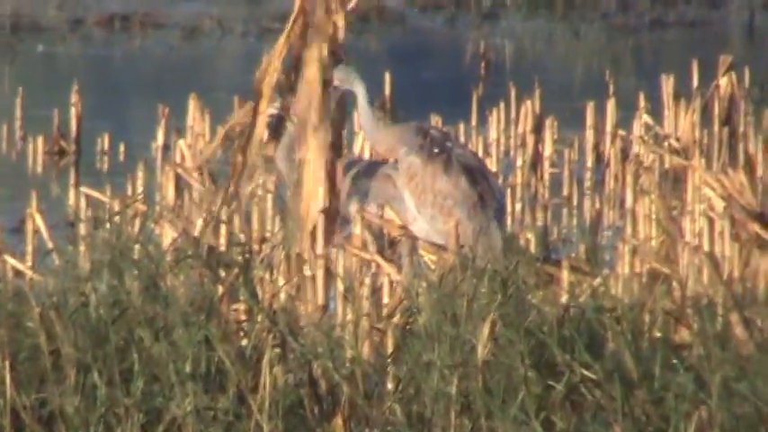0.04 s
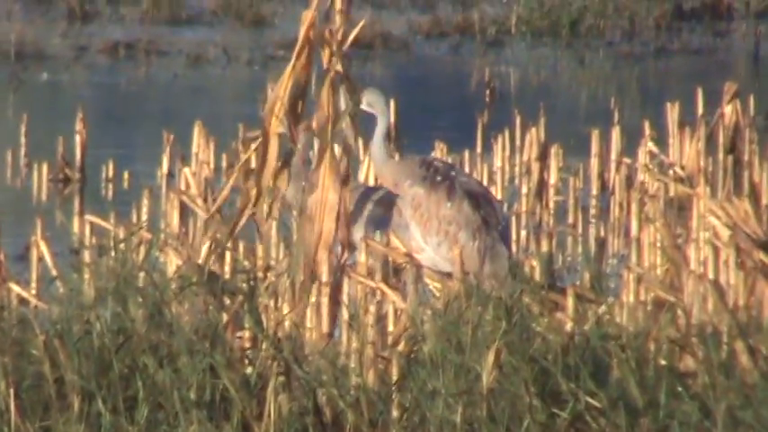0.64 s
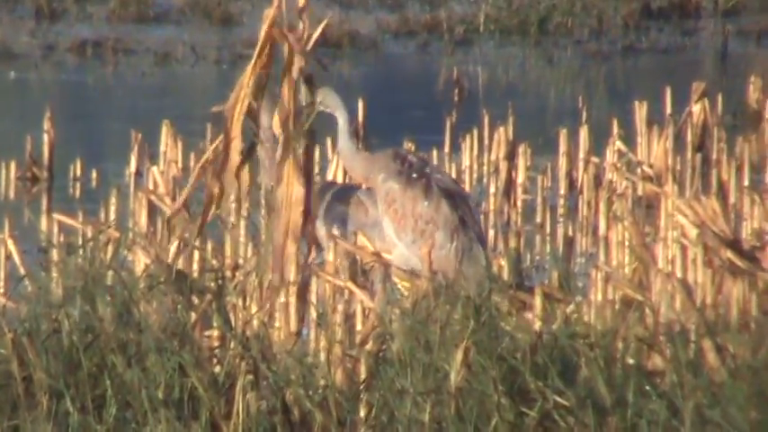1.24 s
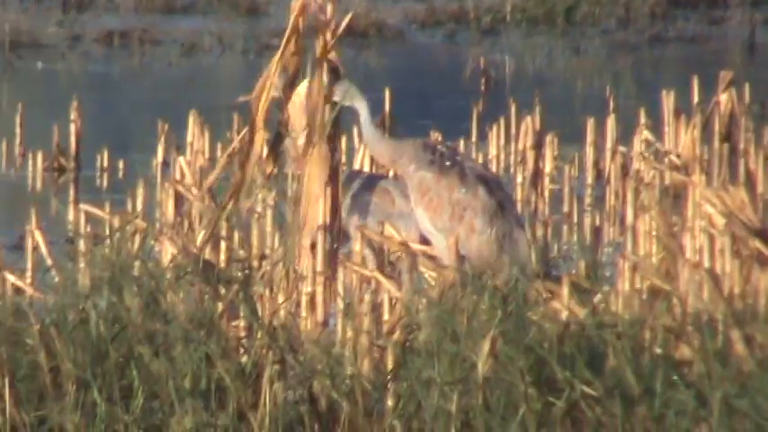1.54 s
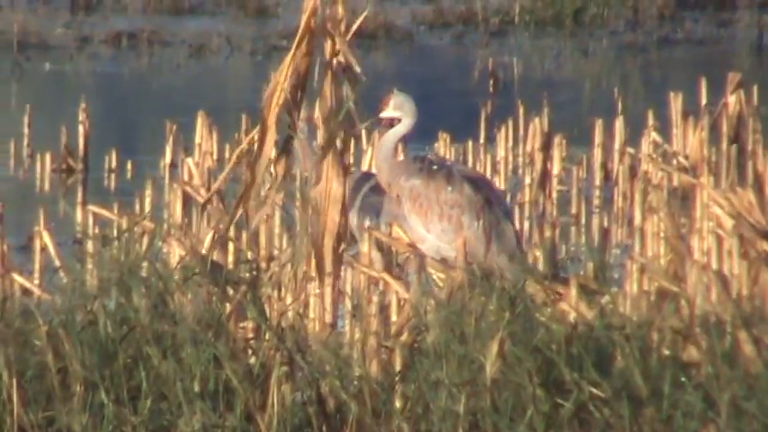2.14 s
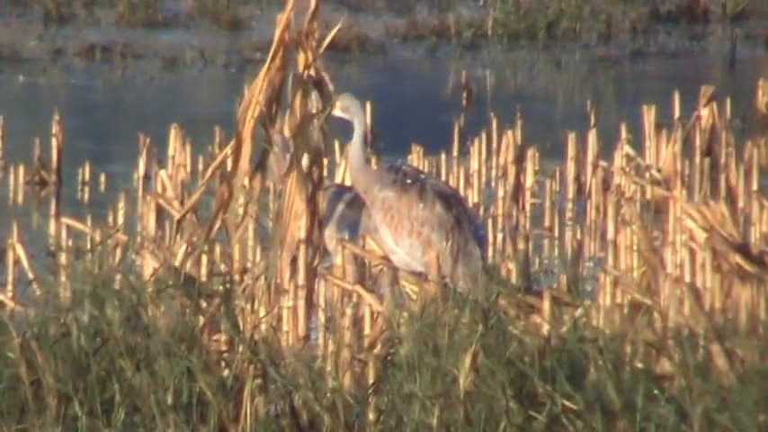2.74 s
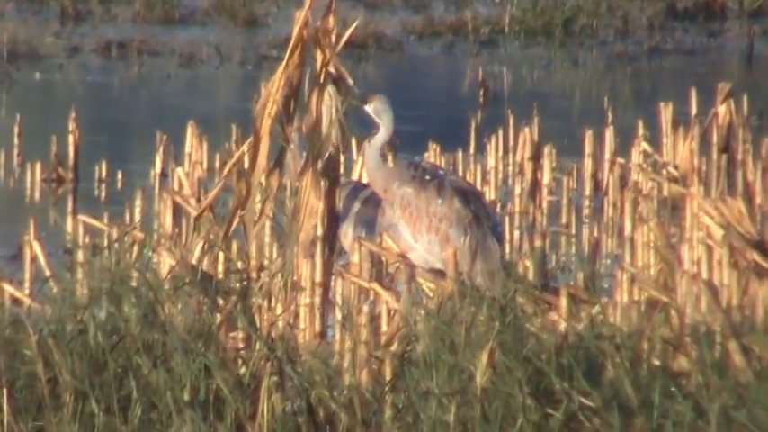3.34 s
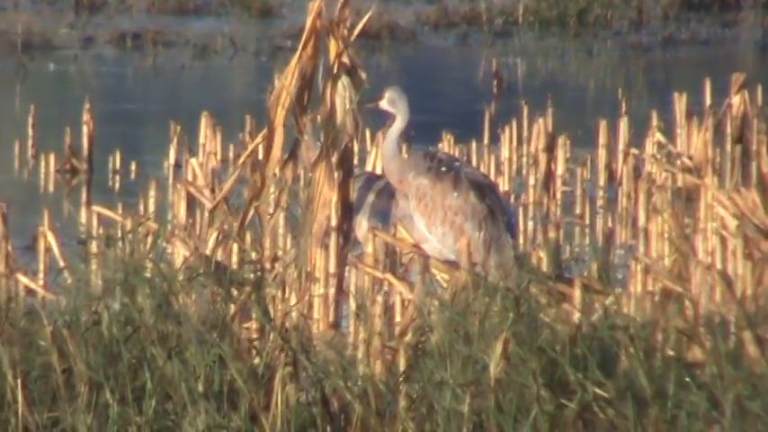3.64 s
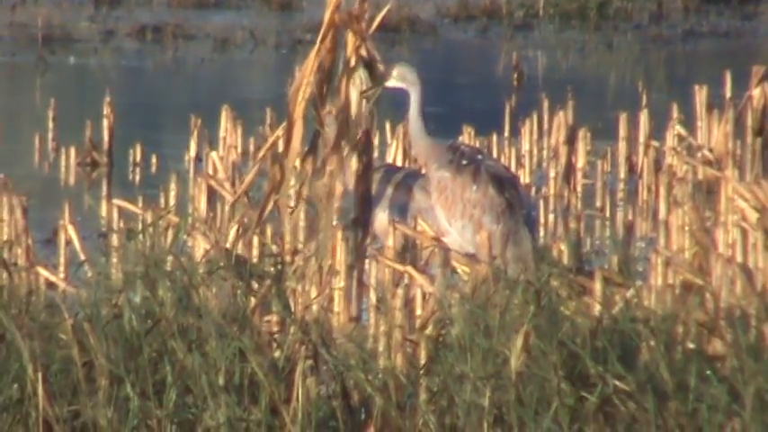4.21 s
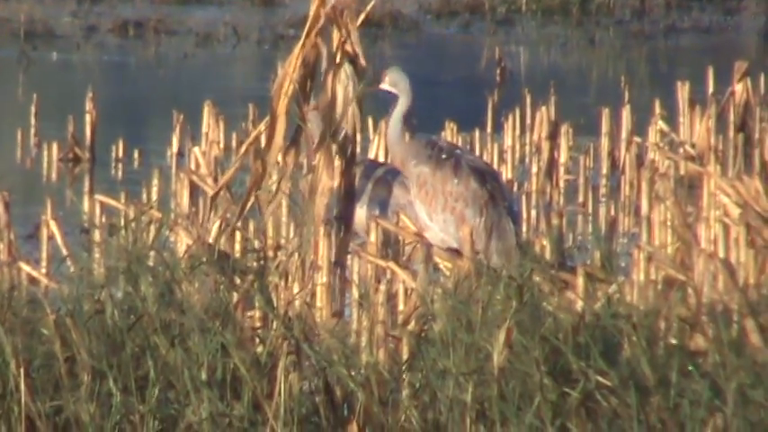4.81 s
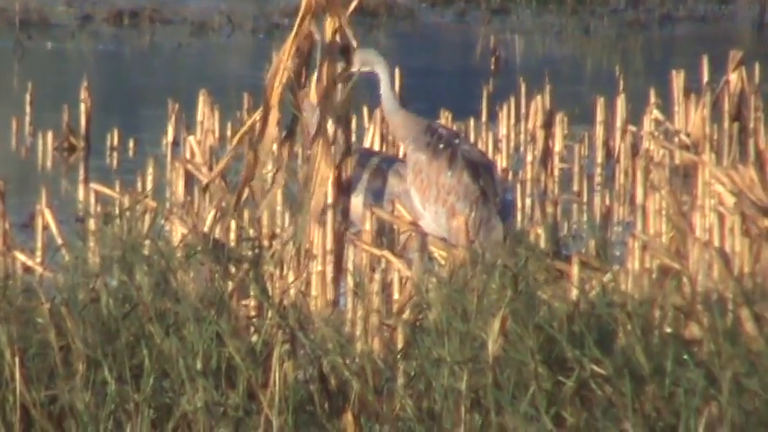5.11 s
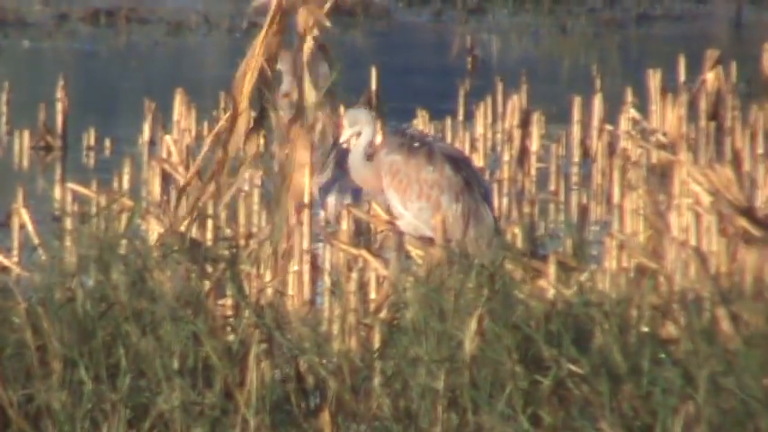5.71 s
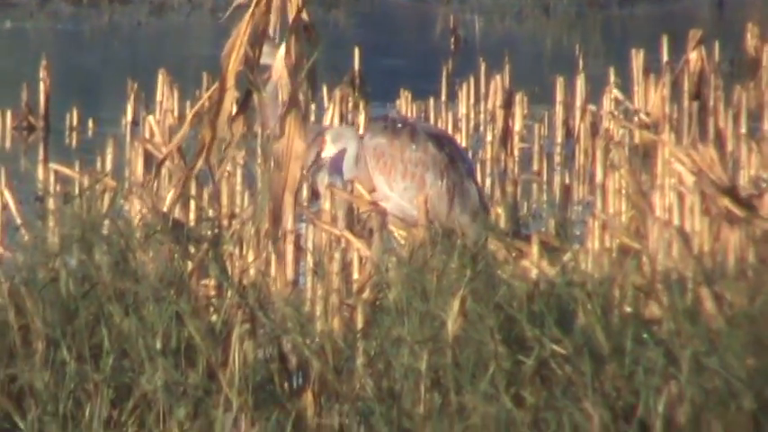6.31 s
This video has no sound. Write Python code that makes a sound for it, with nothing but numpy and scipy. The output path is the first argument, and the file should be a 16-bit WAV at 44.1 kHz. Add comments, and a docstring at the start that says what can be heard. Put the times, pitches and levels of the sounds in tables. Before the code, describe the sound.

A steady low rumble and soft hiss fill an open, flooded stubble field for about six and a half seconds. Right at the start a camera button clicks once, close and dry, and its small motor whirrs very faintly throughout. A faint low drone swells around 0.6 seconds and sinks away by 2.5. Far-off small birds give quiet, scattered chips and lisps, and two faint dry ticks fall at 0.3 and 3.5 seconds. At 3.7 seconds a young crane, some way off, gives one thin, high, wavering whistle. From 4.6 to 5.5 seconds it peeps seven more in a quick run, each short whistle scooping up and hooking down in pitch. A longer, quavering peep follows at 5.8 seconds. These calls are the loudest sounds and leave a brief, blurred echo over the water, fading into the rumble and hiss.

```python
"""A flooded stubble field. A young crane peeps nine thin, arched whistles, their octave lifted by a
throat resonance; stalks, field and far bank scatter them so they ring on over the water.
Far small birds chip and lisp with both sides of the syrinx. Close by, a camera's button clicks once
and its motor whirrs faintly throughout. Behind lie two dry ticks, a low drone, rumble and hiss."""
import sys
import numpy as np
from scipy import signal
from scipy.fft import rfft, irfft, next_fast_len
from scipy.io import wavfile
from scipy.ndimage import map_coordinates

SR = 44100
rng = np.random.default_rng(int(sys.argv[2]) if len(sys.argv) > 2 else 0)


def int16_out(signal):
    """Quantize to a 16-bit WAV file."""
    q = np.round(np.clip(np.atleast_2d(signal).T, -1, 1) * 32767)
    wavfile.write(sys.argv[1], SR, q.astype(np.int16))


N = 289296

# Peeps: t/s, length/s, rise/s, aimed start f/Hz, aimed end f/Hz, sag/Hz, fundamental/dB, octave/dB,
# octave swell/dB, third partial/dB, fourth partial/dB, octave left-right/dB, send to field/dB
CRANE_PEEPS = [ (3.7134, .218, .032, 2159, 2083, 212, -64, -43.6, 1, -68, -63.5, 7, -6),
               (4.5971, .1306, .0256, 2193, 2236, 26, -49.5, -39.7, 13, -60, -62.5, 5.5, -5),
               (4.7831, .058, .032, 2238, 2155, 0, -51, -44.5, 6, -58, -63.5, 5, 7.5),
               (4.8833, .054, .027, 2225, 2184, 0, -64, -31.8, 0, -59, -61, 6, -1.5),
               (5.013, .0606, .035, 2299, 2163, 0, -49.5, -40, 3, -60.5, -65.5, 3.5, 3.5),
               (5.1575, .104, .045, 2327, 2136, 0, -46.1, -33.7, -6, -54.7, -61.5, 5, -2.5),
               (5.3222, .0694, .0406, 2230, 2185, 0, -45.9, -37.2, -3, -65.5, -65.5, 3, 1.5),
               (5.4418, .0695, .041, 2254, 2162, 0, -47.6, -48, 8, -63, -71, 5, 9.5),
               (5.8311, .198, .018, 2280, 2231, 213, -52.5, -38.2, 11, -59.5, -62.5, 2, -7), ]


def crane(attack_s=.0075, release_s=.0115, flutter_db=.7, shimmer_db=3.5, throat_db=17):
    """Whistles whose octave sits on the throat resonance: (direct, thrown over the field)."""
    direct, thrown = np.zeros((2, N)), np.zeros((2, N))
    flutter = amp(flutter_db * wobble(120))
    waver = 1 + .003 * wobble(400) + .002 * wobble(70)
    third_flicker, fourth_flicker = shimmer_db * wobble(160), shimmer_db * wobble(160)
    for s, length_s, *contour, base_db, octave_db, swell_db, third_db, fourth_db, pan_db, send_db in (
            CRANE_PEEPS):
        t = np.arange(int(length_s * SR)) / SR
        i = round(s * SR) + np.arange(len(t))
        aim_hz, drop_hz = peep_pitch(t, length_s, *contour)
        phase = 2 * np.pi * np.cumsum((aim_hz - drop_hz) * waver[i]) / SR
        # The voice weakens below the aimed pitch.
        base_fade, octave_fade, upper_fade = np.outer((.032, .06, .023), drop_hz)  # slopes in dB/Hz
        octave_fade = throat_db * np.tanh(octave_fade / throat_db)  # off-resonance loss levels out
        swell = swell_db * (t / length_s - .5)
        voice = (amp(base_db - base_fade) * tone(phase, 3, -.87)
                 + amp(octave_db - octave_fade + swell) * tone(2 * phase, pan_db, -.55)
                 + amp(third_db - upper_fade + third_flicker[i]) * tone(3 * phase, 4.5, -.8)
                 + amp(fourth_db - upper_fade + fourth_flicker[i]) * tone(4 * phase, 2.7, .65))
        envelope = np.clip(np.minimum(t / attack_s, (length_s - t) / release_s), 0, 1)
        voice *= envelope * flutter[i]
        add(direct, s, voice)
        add(thrown, s, amp(send_db) * voice)
    return direct, thrown


def peep_pitch(t, length_s, rise_s, start_hz, end_hz, sag_hz, scoop_hz=452, hook_hz=232, hook_s=.024):
    """A peep scoops up, quavers and hooks down: (aimed pitch, drop below it) in Hz."""
    middle = np.clip((t - rise_s) / max(length_s - hook_s - rise_s, .001), 0, 1)
    scoop = scoop_hz * np.clip(1 - t / rise_s, 0, 1) ** 3.12
    sag = sag_hz * np.sin(np.pi * middle ** .51) ** 2  # early dip, slow recovery
    tremor = 18 * np.sin(np.pi * 26.4 * (t - rise_s)) ** 2
    hook = hook_hz * np.clip(1 - (length_s - t) / hook_s, 0, 1) ** 1.77
    return start_hz + (end_hz - start_hz) * t / length_s, scoop + sag + tremor + hook


# Field response: f/Hz, gain/dB
ECHO_EQ = [(2000, -4), (3800, -2), (4300, 7), (4700, 13.5), (5100, -12), (6500, -9), (9000, -10)]


def field_echo(calls, blur_hz=750):
    """Near stalks scatter the calls at once; field and far bank return a blurred, hissing wash."""
    t = np.arange(SR) / SR

    def scatter(sound, t60_s, delay_s):
        tail = rng.standard_normal((2, SR)) * amp(-60 * t / t60_s) * (t > delay_s)
        return signal.fftconvolve(sound[None], unit(tail) / np.sqrt(SR), axes=1)[:, :N]

    mono = calls.mean(0)
    blurred = mono * wobble(blur_hz)
    stalks = amp(-20.5) * scatter(mono, t60_s=.072, delay_s=.0025)
    field = amp(-20) * scatter(blurred, t60_s=.81, delay_s=.0089)
    bank = amp(-26) * scatter(blurred, t60_s=.65, delay_s=.11)
    return coloured(stalks + field + bank, ECHO_EQ)


# Chips: t/s, relative level/dB
BIRD_CHIPS = [(0.408, -52), (1.4616, -50.8), (1.808, -53.5), (2.7816, -51), (3.5424, -52), (3.934, -53.5),
              (4.8176, -48), (4.8694, -59), (5.5094, -57), (6.1244, -59)]
# Noise puff of a chip: f/Hz, level/dB
CHIP_SPECTRUM = [(1200, -41), (2000, -7), (2400, 2.5), (2900, 0), (3400, 0), (4200, -15), (7000, -24)]
# Lisps: t/s, length/s, nominal start f/Hz, nominal end f/Hz, level/dB
BIRD_LISPS = [(0.293, 0.041, 2500, 2950, -62), (1.079, .055, 2620, 3190, -57),
              (6.185, .06, 2500, 2900, -63)]


def small_birds(chip_s=.0145, start_hz=2800, end_hz=2150, chip_rough=.06):
    """Harsh falling chips with a puff of noise, rising lisps and a fainter flock beyond."""
    out = puffs(BIRD_CHIPS, CHIP_SPECTRUM, rise_s=.0065, gain_db=-5)
    for s, db in BIRD_CHIPS:
        add(out, s, amp(db - 6.5) * syrinx(chip_s, start_hz, end_hz, chip_rough))
    for s, length_s, low_hz, high_hz, db in BIRD_LISPS:
        add(out, s, amp(db) * syrinx(length_s, low_hz, high_hz, rough=.033))
    for when, size, pitch in rng.random(size=(40, 3)):
        flock_chip = syrinx(chip_s, start_hz * (.85 + .3 * pitch), end_hz, chip_rough)
        add(out, when * N / SR, amp(-69 + 7.8 * size) * flock_chip)
    return out


def syrinx(length_s, start_hz, end_hz, rough):
    """Both sides of the syrinx slide together, unsteady, below and above the nominal pitch."""
    n = int(length_s * SR)
    glide_hz = np.linspace(start_hz, end_hz, n)

    def side(ratio):
        jitter = map_coordinates(rng.standard_normal(128), [np.arange(n) * 900 / SR], order=1)
        return np.sin(2 * np.pi * ratio / SR * np.cumsum(glide_hz * (1 + rough * jitter)))

    return np.hanning(n) ** .5 * (.79 * side(.95) + side(1.28))


# Camera body modes: f/Hz, relative level/dB, t60/s, left lead/rad
BODY_MODES = [(805, -17, 0.03, -2), (1050, -2.5, 0.02, -1.5), (1136, -3.5, 0.012, -2.2),
              (1590, -3.5, .018, -2.44), (2810, -12.5, 0.01, -1.2), (3920, -22.5, 0.023, -0.17),
              (4180, -14.5, 0.025, 0.91), (4810, -4.5, 0.0092, -0.7), (5200, -16, .012, 0),
              (6560, -18, 0.016, 0), (7800, -20, 0.013, 1), (8930, -14.5, 0.0092, 0),
              (9500, -13, 0.0075, 0)]
# Loose camera parts: f/Hz, level/dB
RATTLE_SPECTRUM = [(300, -18), (600, 4.5), (1200, 3), (2000, -6), (3000, -12), (4600, -4), (8000, -18.5),
                   (14000, -28)]
# Dry crack of button and ticks: f/Hz, level/dB
CRACK_SPECTRUM = [(800, -39), (2500, 6), (6500, 2), (9500, -3), (15000, -14)]


def camera_button(at_s=.0439, gain_db=-12.6, build_cycles=1.35):
    """One snap rings the body, low modes building more slowly; loose parts rattle faintly."""
    out, t = np.zeros((2, N)), np.arange(SR // 8) / SR
    for hz, db, t60_s, lead_rad in BODY_MODES:
        build = 1 - np.exp(-(t * hz / build_cycles) ** 2)
        add(out, at_s, amp(db - 60 * t / t60_s) * build * tone(2 * np.pi * hz * t, -3, lead_rad))
    attack = 1 - np.exp(-t / .0003)
    for spectrum, db, t60_s in [(CRACK_SPECTRUM, -9, .009), (RATTLE_SPECTRUM, -25, .12)]:
        hiss = np.array([noise(spectrum)[:len(t)] for _ in range(2)])
        add(out, at_s, amp(db - 60 * t / t60_s) * attack * hiss)
    return amp(gain_db) * out


# Ticks: t/s, relative level/dB
DRY_TICKS = [(0.2693, -49.5), (3.491, -50)]


def ticks():
    """Two faint, dry ticks of noise."""
    return puffs(DRY_TICKS, CRACK_SPECTRUM, rise_s=.0015, gain_db=-2)


# Motor run-up: t/s, fraction of full speed, strain/dB
MOTOR_RUN_UP = [(0, .885, 4), (.1, .94, 7), (.2, .99, 5), (.3, 1, 0)]
# Whine lines at full speed: f/Hz, level/dB, strain weight
WHINE_LINES = [(226.5, -71, 0), (317, -77.5, 0.18), (371.4, -76, 0.16), (1982, -81.5, 0), (3906, -76, 0.3),
               (4460, -78, 0.5), (4990, -78, 1.6), (6760, -83.5, 0.61), (9500, -81.5, .5)]
# Rotor buzz: f/Hz, level/dB
BUZZ_SPECTRUM = [(150, -42), (330, 7.5), (600, 2), (900, 6), (1300, -10.5), (1600, -5.5), (2200, -14),
                 (5000, -40)]
# Run-up squeal: f/Hz, level/dB
SQUEAL_SPECTRUM = [(3000, -36), (8200, -15), (9500, -7), (11000, -23), (12100, -19), (12420, -4),
                   (12750, -22), (13400, -9), (13900, -32)]


def camera_motor(turn_hz=30.94, harmonic=35, whirr_db=-60, buzz_db=-70, squeal_db=-69):
    """A small rotor sings for part of each turn and buzzes; on run-up it squeals and its whine rises."""
    t = np.arange(N) / SR
    times, speeds, strains = np.transpose(MOTOR_RUN_UP)
    speed, strain_db = np.interp(t, times, speeds), np.interp(t, times, strains)
    turn = 2 * np.pi * turn_hz * (t - .011)
    rub = unit(np.clip(np.cos(turn) + .92, 0, .9)) * amp(.86 * wobble(40))
    lag = 2 * np.pi * harmonic * turn_hz * np.cumsum(1 - np.sqrt(speed)) / SR  # grows while running up, flat once up to speed
    whirr_phase = harmonic * turn - lag - .62 * np.cos(2 * turn) - .19 * np.sin(turn)
    out = amp(whirr_db + .52 * strain_db) * rub * tone(whirr_phase, -5.5, -1.4)
    # The same roughness passes on every turn.
    roughness = map_coordinates(rng.standard_normal(512), [turn / (2 * np.pi) % 1 * 511], order=1)
    out += amp(buzz_db) * unit(coloured(roughness - roughness.mean(), BUZZ_SPECTRUM))
    for hz, db, weight in WHINE_LINES:
        phase = 2 * np.pi * hz * np.cumsum(speed) / SR + .5 * wobble(8)
        out += amp(db + weight * strain_db + wobble(3.84)) * tone(phase, -7, 0)
    return out + amp(squeal_db) * np.clip(strain_db, 0, 1) * noise(SQUEAL_SPECTRUM)


# Drone envelope: t/s, level/dB
DRONE_LEVEL = [(0, -70), (.6, -62), (1.5, -68), (2.6, -73), (6.5, -72)]
# Drone band: f/Hz, level/dB
DRONE_SPECTRUM = [(150, -40), (205, -6), (228, 0), (250, -8), (320, -40), (600, -90)]


def drone():
    """A low, narrow band of noise swells early and sinks back into the rumble."""
    level_db = np.interp(np.arange(N) / SR, *np.transpose(DRONE_LEVEL))
    return amp(level_db) * noise(DRONE_SPECTRUM)


# Centred rumble and hiss: f/Hz, level/dB
MID_SPECTRUM = [(12, -20), (35, 1), (80, 1.5), (230, -6), (350, -12), (700, -15), (1400, -19.5),
                (2000, -21.5), (3000, -21.5), (3800, -22.5), (4900, -20), (5800, -25), (8500, -27),
                (9700, -24.7), (11000, -28), (15500, -29.2)]
# Wide rush: f/Hz, level/dB
SIDE_SPECTRUM = [(20, -52), (60, -26.5), (200, -18), (500, -13.5), (1200, -13), (2200, -18), (4000, -24),
                 (6500, -30.5), (10000, -33.5), (15500, -39.5)]


def air(mid_db=-55, side_db=-54, swell_db=-1.76, rumble_hz=250):
    """Distant wavering rumble and steady hiss in the middle, a soft wide rush around them."""
    mid = amp(mid_db) * noise(MID_SPECTRUM)
    rumble = filtered(mid, lambda hz: 1 / (1 + (hz / rumble_hz) ** 4))
    mid += rumble * (amp(swell_db * wobble(15)) - 1)
    side = amp(side_db) * noise(SIDE_SPECTRUM)
    return np.array([mid + side, mid - side])


def puffs(events, spectrum, rise_s, gain_db):
    """Noise bursts at (t/s, level/dB) that swell for rise_s and die away."""
    envelope, age = np.zeros(N), np.arange(SR // 8) / SR / rise_s
    for s, db in events:
        add(envelope, s, amp(db + gain_db) * age * np.exp(1 - age))
    return envelope * noise(spectrum)


def tone(phase, pan_db, lead_rad):
    """Stereo sine of rms 1, the left pan_db louder and lead_rad ahead."""
    sides = np.array([[.5], [-.5]])
    return np.sqrt(2) * unit(amp(pan_db * sides)) * np.sin(phase + lead_rad * sides)


def noise(spectrum):
    """Coloured noise of rms 1."""
    return unit(coloured(rng.standard_normal(N), spectrum))


def coloured(x, points):
    """x through (f/Hz, gain/dB) points on a log axis."""
    f, db = np.transpose(points)
    return filtered(x, lambda hz: amp(np.interp(np.log(hz + 1), np.log(f), db)))


def filtered(x, response):
    """x through a frequency response."""
    m = next_fast_len(N + SR // 2)
    return irfft(rfft(x, m) * response(np.fft.rfftfreq(m, 1 / SR)), m)[..., :N]


def wobble(rate_hz):
    """Smooth random curve, rate_hz knots a second."""
    knots = rng.standard_normal(int(N * rate_hz / SR) + 4)
    return map_coordinates(knots, [np.arange(N) * rate_hz / SR])


def add(track, s, sound):
    """Mix a sound into a track at s seconds."""
    part = track[..., max(round(s * SR), 0):][..., :sound.shape[-1]]
    part += sound[..., :part.shape[-1]]


def amp(db):
    """Decibels to gain."""
    return 10 ** (np.asarray(db) / 20)


def unit(x):
    """Scale to rms 1."""
    return x / np.sqrt(np.mean(x ** 2) + 1e-20)


def scene():
    """Birds echo over the open field; the camera is close and dry."""
    peeps, thrown = crane()
    chatter = small_birds()
    return (peeps + chatter + ticks() + field_echo(thrown + chatter)
            + camera_button() + camera_motor() + drone() + air())


def record(dry):
    """Brick-wall low-pass at 15.8 kHz."""
    return filtered(dry, lambda hz: hz < 15800)


dry = scene()
out = record(dry)
int16_out(out)
```